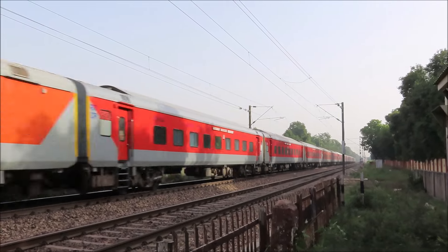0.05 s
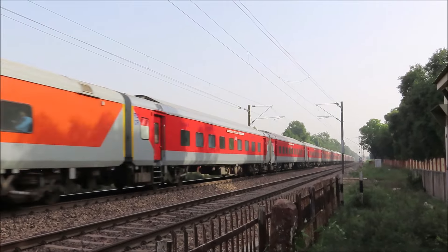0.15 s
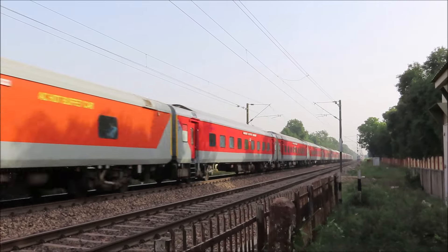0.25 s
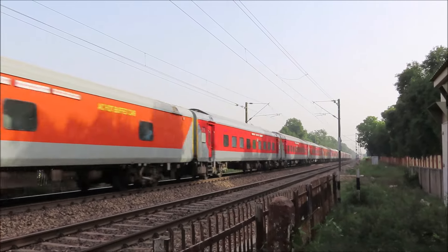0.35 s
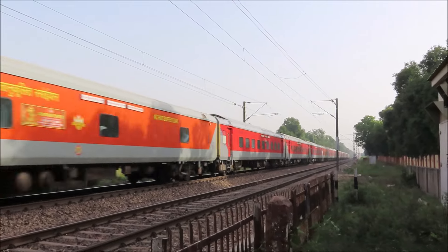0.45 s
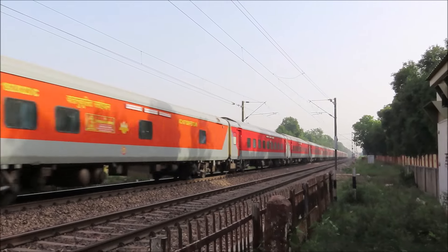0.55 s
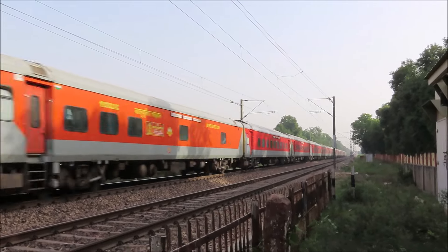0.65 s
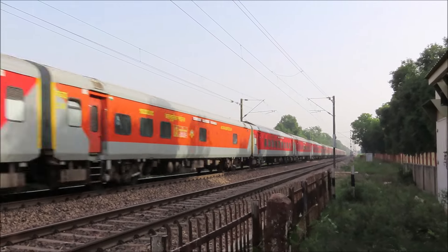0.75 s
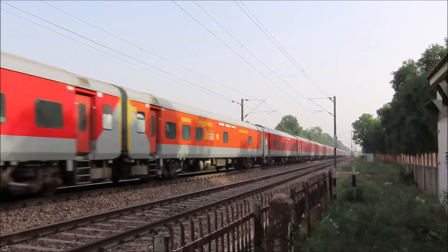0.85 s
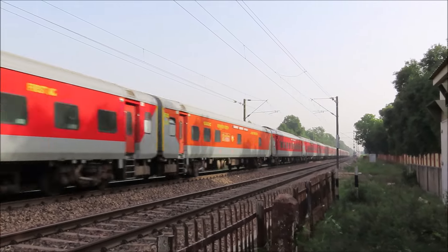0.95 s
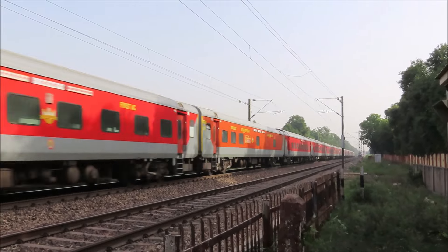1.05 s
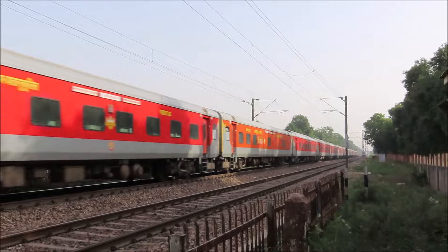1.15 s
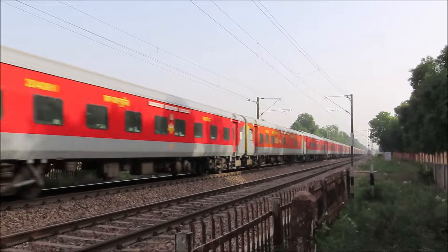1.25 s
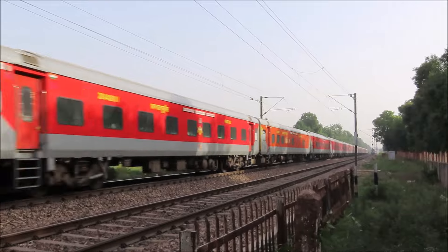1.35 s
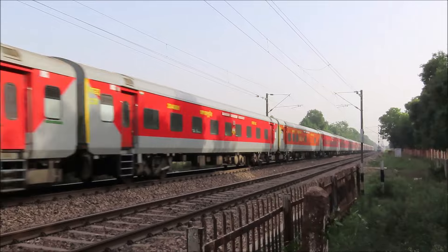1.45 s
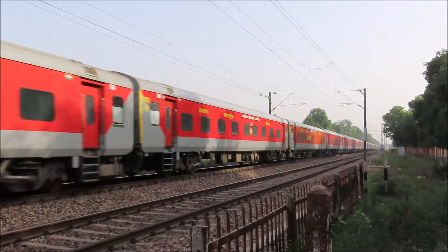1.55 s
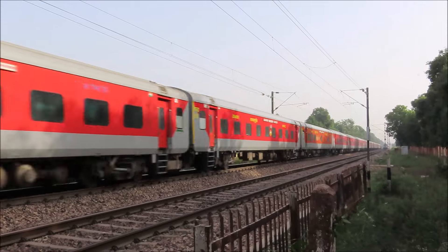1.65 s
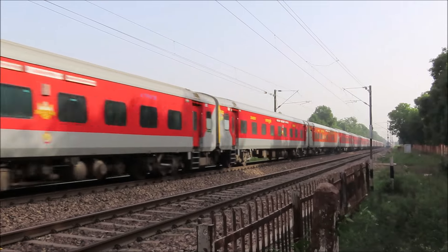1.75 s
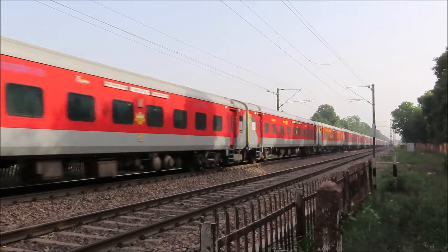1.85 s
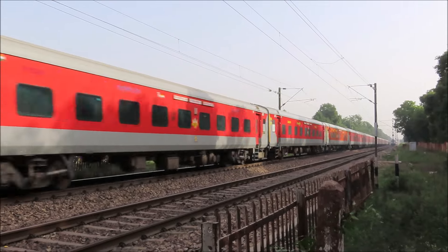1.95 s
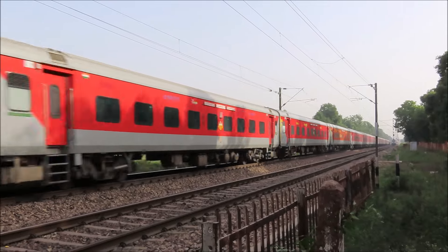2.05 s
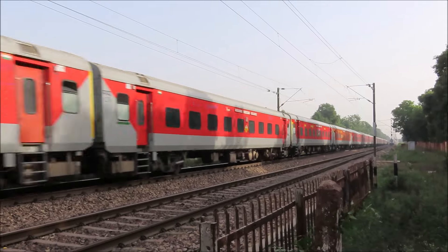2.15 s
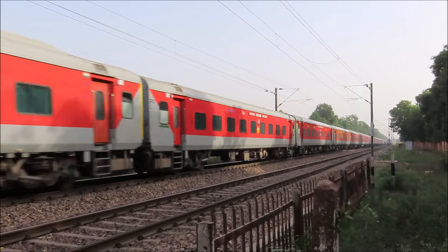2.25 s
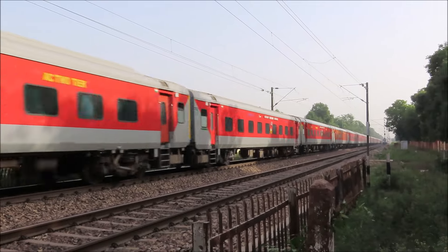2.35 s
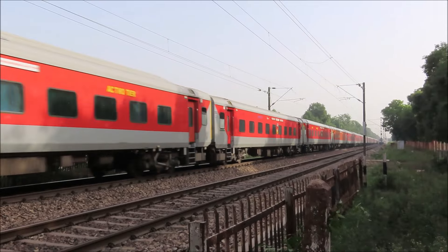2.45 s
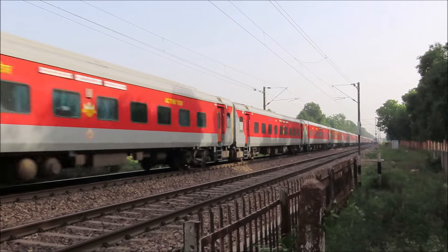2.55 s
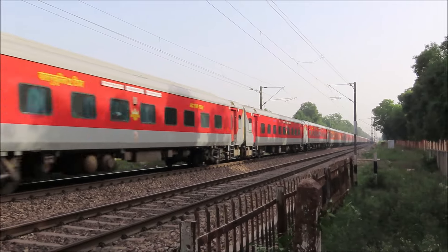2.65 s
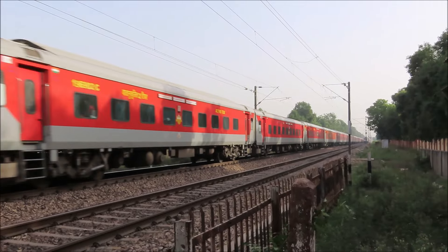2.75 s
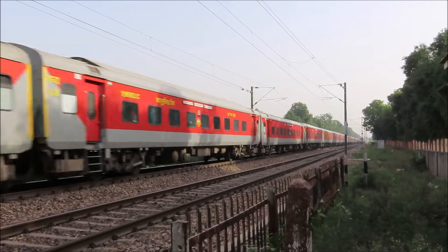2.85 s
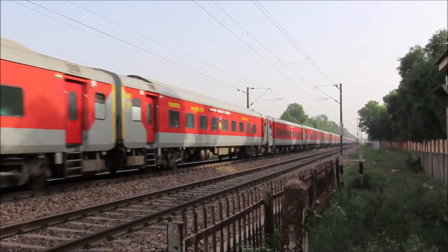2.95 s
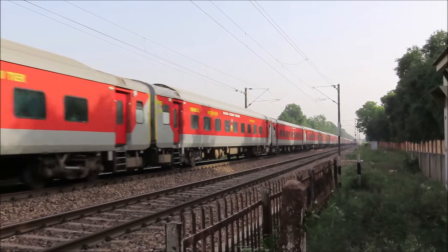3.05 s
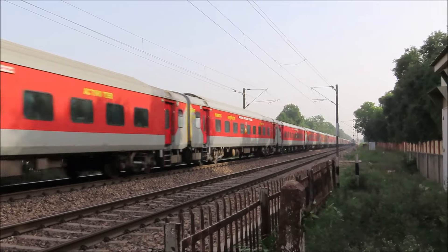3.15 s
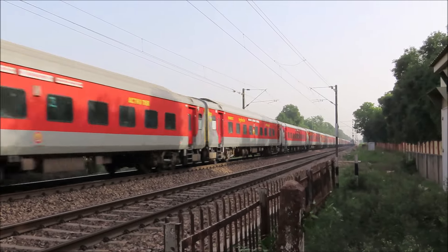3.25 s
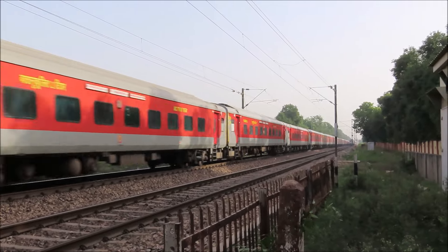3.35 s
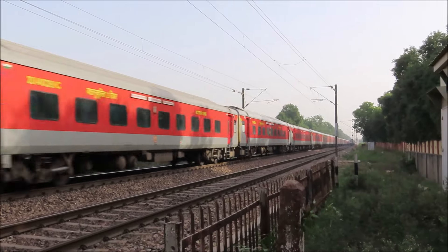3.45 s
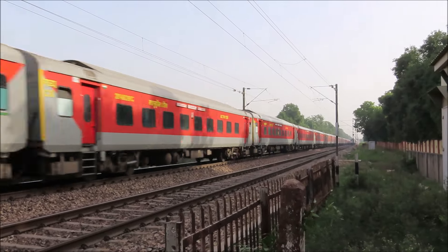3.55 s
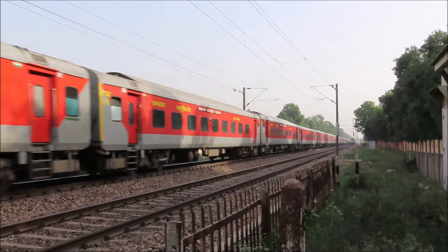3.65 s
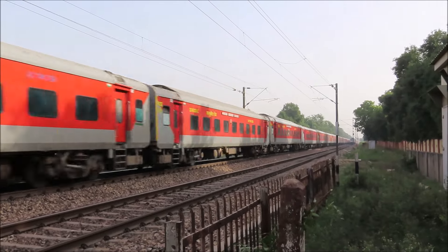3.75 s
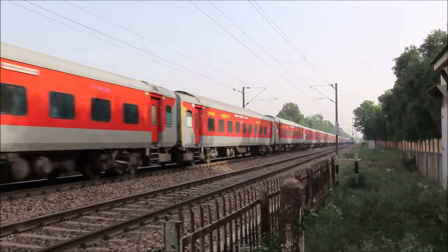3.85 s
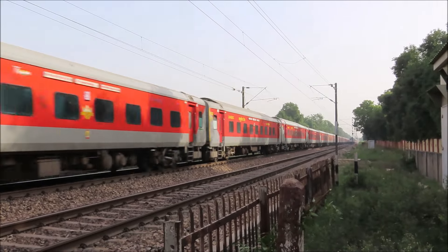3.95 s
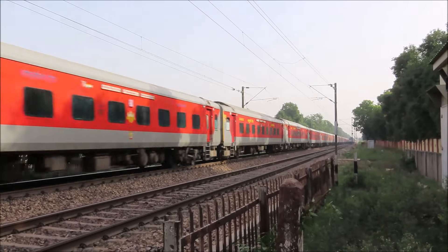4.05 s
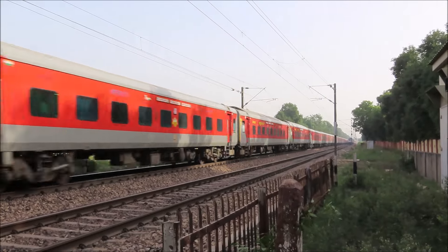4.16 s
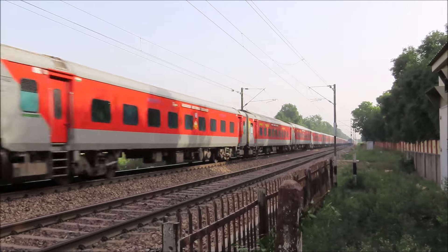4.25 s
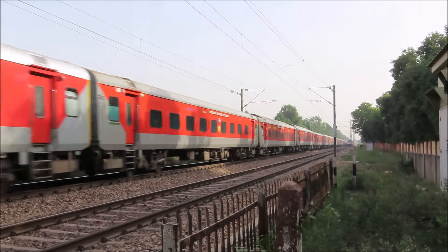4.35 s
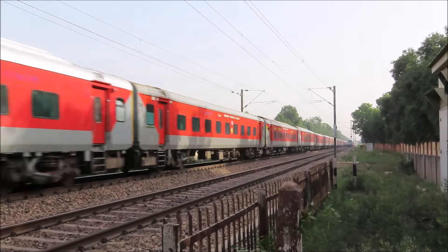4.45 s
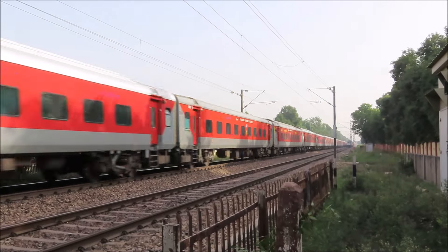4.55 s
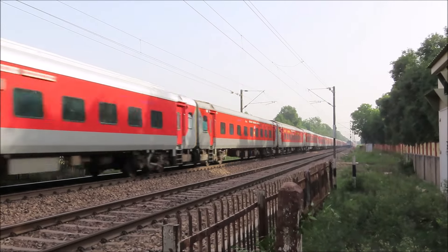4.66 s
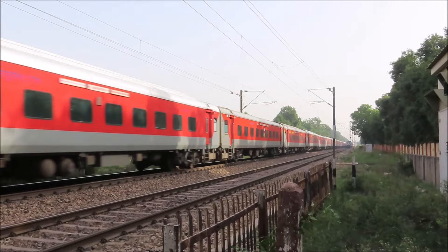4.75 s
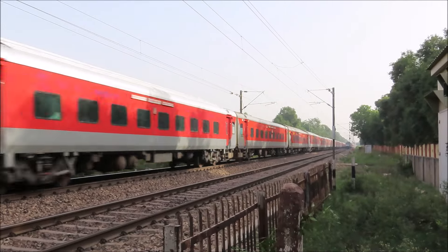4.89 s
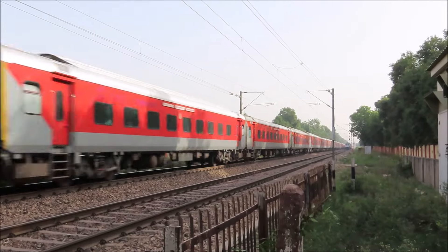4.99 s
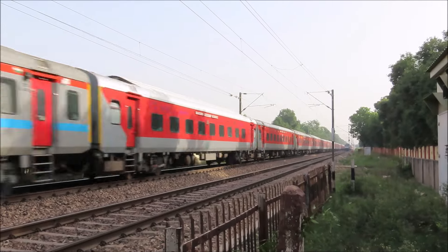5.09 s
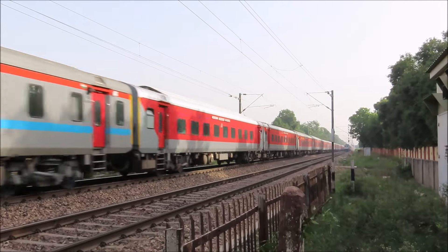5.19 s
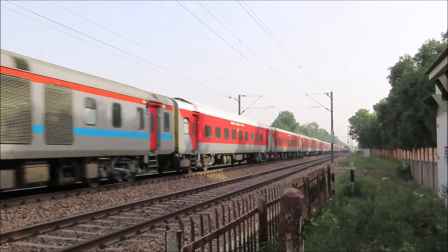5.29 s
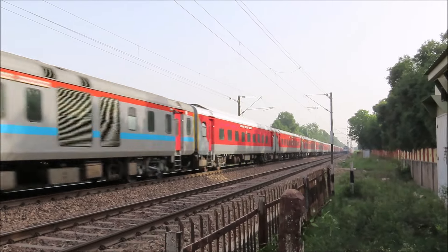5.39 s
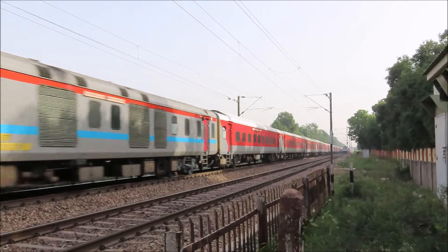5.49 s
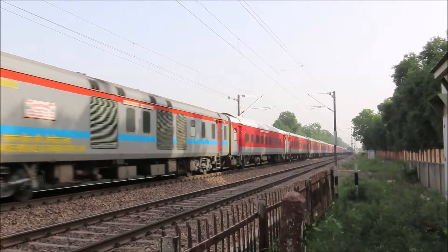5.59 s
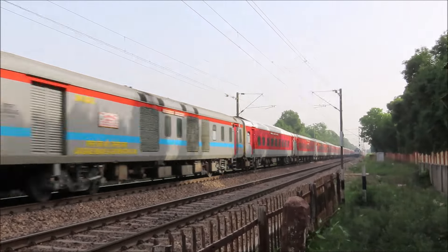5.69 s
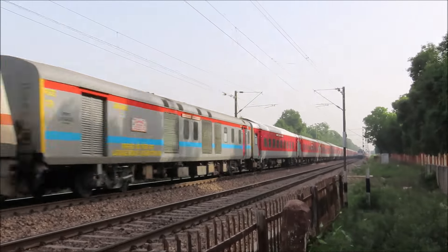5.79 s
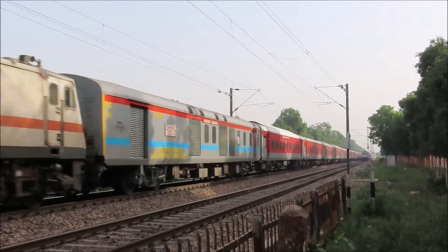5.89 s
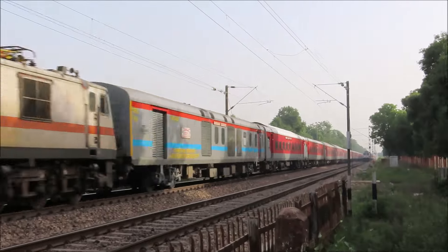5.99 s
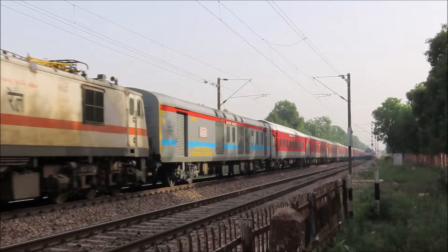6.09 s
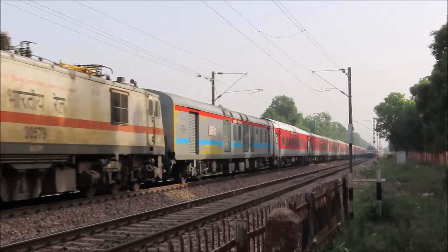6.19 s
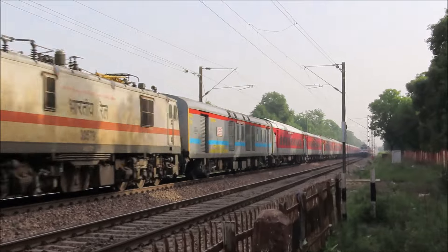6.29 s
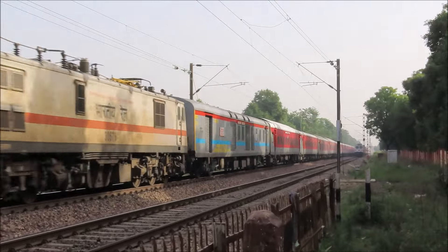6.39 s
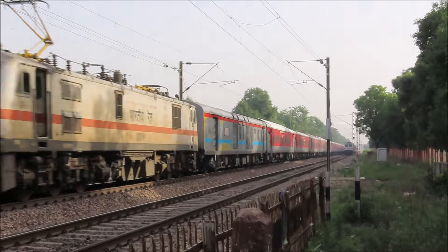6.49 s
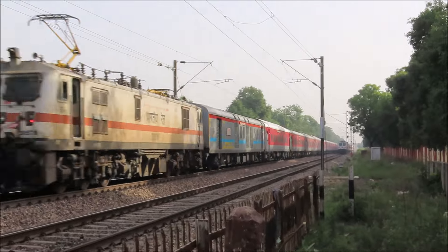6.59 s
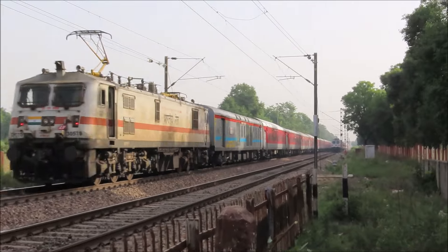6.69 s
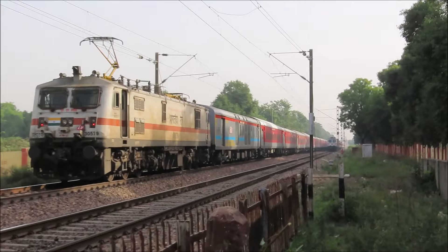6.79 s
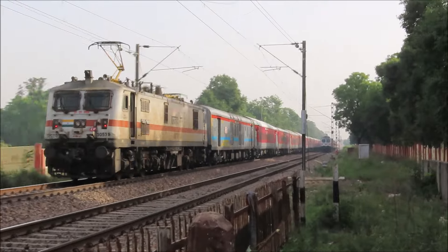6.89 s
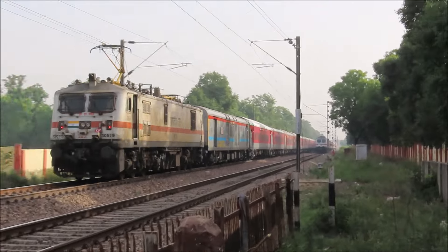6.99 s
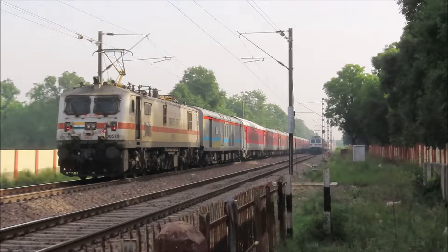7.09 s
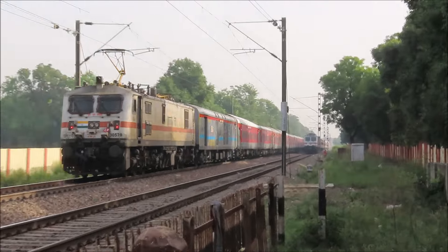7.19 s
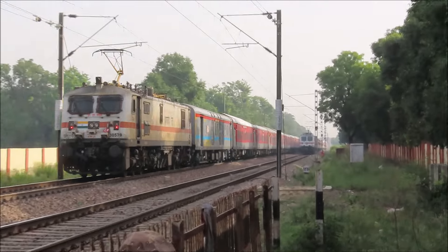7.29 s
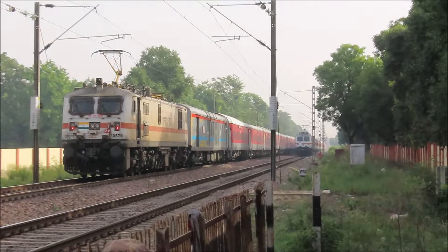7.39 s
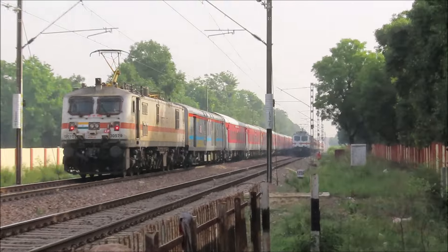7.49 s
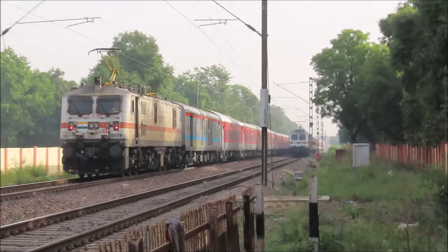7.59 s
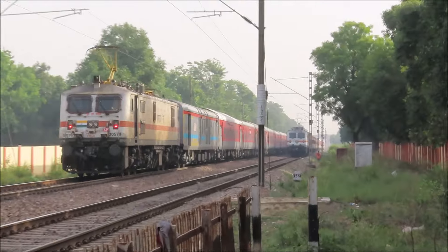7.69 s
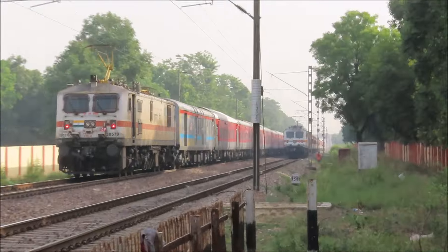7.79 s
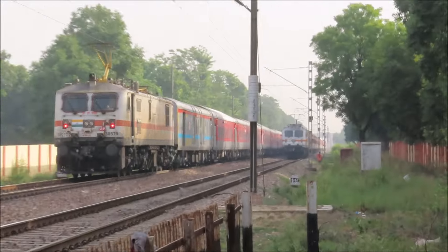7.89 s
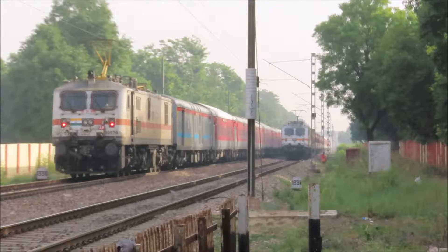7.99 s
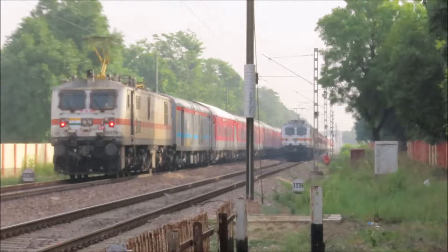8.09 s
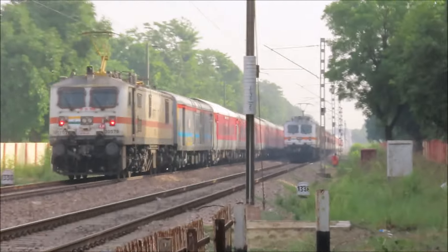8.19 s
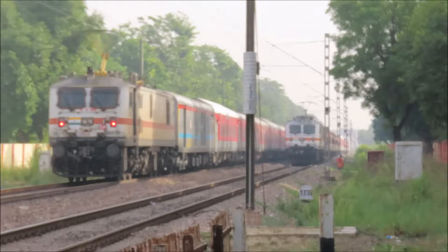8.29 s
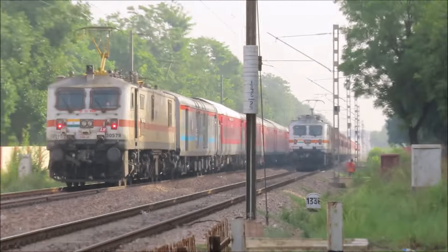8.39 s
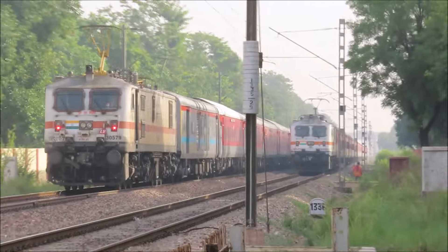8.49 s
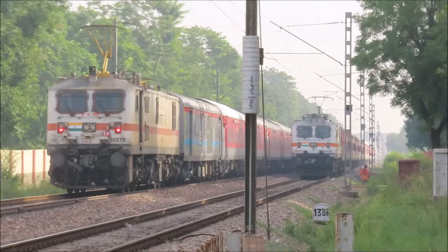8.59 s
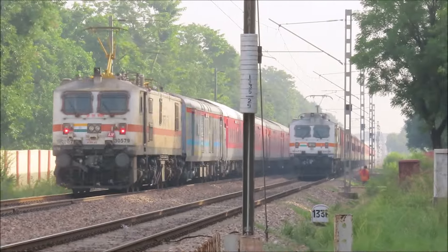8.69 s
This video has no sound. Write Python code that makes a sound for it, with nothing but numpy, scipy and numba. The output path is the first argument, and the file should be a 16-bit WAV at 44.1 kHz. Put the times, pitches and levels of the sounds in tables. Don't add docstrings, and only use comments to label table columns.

```python
import sys
import numpy as np
from scipy import signal
from scipy.fft import rfft, irfft, next_fast_len
from scipy.io import wavfile
from scipy.ndimage import uniform_filter1d
from numba import njit

SR = 44100
rng = np.random.default_rng(int(sys.argv[2]) if len(sys.argv) > 2 else 0)


def store_pcm(level_fs):
    pcm = np.round(np.clip(level_fs, -1, 1) * 32767).astype(np.int16)
    wavfile.write(sys.argv[1], SR, np.atleast_2d(pcm).T)


def amplitude_ratio(level_db):
    exponent = np.asarray(level_db, float) / 20
    return 10 ** exponent


N = 385434
SIZE = next_fast_len(N)
FREQ = np.maximum(np.fft.rfftfreq(SIZE, 1 / SR), 1)
TIME = np.arange(N) / SR


def curves(table):
    s, *columns = np.transpose(table)
    return [np.interp(TIME, s, c) for c in columns]


def shape(points):
    hz, db = np.transpose(points)
    return amplitude_ratio(np.interp(np.log(FREQ), np.log(hz), db))


def colour(x, gain):
    return irfft(rfft(x, SIZE) * gain, SIZE)[..., :N]


def noise():
    return rng.standard_normal((2, N))


def unit(x):
    return x / np.sqrt(np.mean(x ** 2))


@njit
def svf(x, hz, width):
    y = np.empty(x.shape)
    for row in range(x.shape[0]):
        b, l = 0., 0.
        for i in range(x.shape[1]):
            g, k = np.tan(np.pi * hz[i] / SR), width / hz[i]
            v = (b + g * (x[row, i] - l)) / (1 + g * (g + k))
            b, l, y[row, i] = 2 * v - b, l + 2 * g * v, k * v
    return y


def walk(rate):
    k = int(SR / rate)
    steps = np.repeat(rng.standard_normal(N // k + 1), k)
    return 1.3 * uniform_filter1d(uniform_filter1d(steps, k), k)[:N]


def band(hz, width):
    return unit(svf(noise(), hz + 0 * TIME, 1. * width)[0])


def ringing(modes, swing_db, doppler):
    out = np.zeros((2, N))
    for hz, width, db in modes:
        pitch = hz * (1 + doppler * walk(5))
        out += amplitude_ratio(db + swing_db * walk(7)) * svf(noise(), pitch, 1. * width)
    return out


def chatter(spectrum, count, chatter_db):
    out, gain = np.zeros((2, N + SR)), shape(spectrum)
    for when, pitch, length, size, row in rng.random((count, 5)):
        hz = 600 * (4600 / 600) ** pitch
        t = TIME[:int(SR * (.025 + .06 * length))]
        flare = np.sin(np.pi * t / t[-1]) ** 2 * np.sin(2 * np.pi * hz * t)
        level = amplitude_ratio(chatter_db + 6.9 * size) * np.interp(hz, FREQ, gain)
        out[int(2 * row), int(when * N):][:len(t)] += level * flare
    return out[:, :N]


ZONES_HZ = (115, 400, 1280, 2600, 5000)


def zones(spectrum, tones):
    whole = rfft(colour(noise(), shape(spectrum)) + tones, SIZE)
    below = [0] + [1 / (1 + (FREQ / hz) ** 10) for hz in ZONES_HZ] + [1]
    return [unit(irfft(whole * (high - low), SIZE)[:, :N]) for low, high in zip(below, below[1:])]


def train(spectrum, modes, rail_db, levels_db, rail_hz, swing_db, doppler, chatter_db):
    rail = amplitude_ratio(rail_db - 9.5) * svf(noise(), 1.048 * rail_hz, 178.)
    wheels = amplitude_ratio(-12.5) * ringing(modes, swing_db, doppler)
    wheels = wheels + chatter(spectrum, count=2400, chatter_db=chatter_db)
    return sum(amplitude_ratio(db) * part for db, part in zip(levels_db, zones(spectrum, rail + wheels)))


# frequency in Hz, density in dB per Hz.
NEAR = [(20, -49), (44, -18), (91, -12.5), (173, -1), (240, -4.5), (330, -10.5), (520, -11.5), (900, -10),
        (1330, -18), (2140, -19.5), (4000, -23), (8240, -32.5), (11000, -61), (15000, -86)]
# frequency in Hz, width in Hz, level in dB.
WHEEL = [(163.2, 33, 6), (1505, 99, -3.5), (1750, 220, -3.5), (2100, 62, -4), (2350, 38, -7),
         (2640, 32, -5), (3136, 140, -8)]


def express(levels_db, rail_hz):
    return train(NEAR, WHEEL, 0.5, levels_db, rail_hz, swing_db=1.4, doppler=0.017, chatter_db=-22.5)


def knocks(table):
    out, t, jangle_hz = np.zeros(N), TIME[:SR // 4], 45 * walk(120)
    for s, hz, db, t60 in table:
        pitch = hz + np.sqrt(hz / 2000) * jangle_hz[rng.integers(N - SR):][:len(t)]
        envelope = amplitude_ratio(db - 60 * t / t60) * (1 - np.exp(-t / 0.0012)) ** 2
        out[int(s * SR):][:len(t)] += envelope * np.sin(2 * np.pi * np.cumsum(pitch) / SR)
    return out


# start in seconds, peak in dB, frequency in Hz.
CLATTER = [(0.017, -8, 1460), (0.08, -10, 910), (0.252, -7, 790), (0.277, -9, 1070), (0.317, -7, 802),
           (0.368, -9, 784), (0.396, -13, 2160), (0.615, -4.5, 970), (0.652, -10, 1050), (0.852, -8, 926),
           (1.023, -7, 650), (1.121, -20, 870), (1.151, -10, 880), (1.194, -8, 856), (1.245, -4, 820),
           (1.507, -6.5, 950), (1.549, -11, 867), (1.639, -11, 861), (1.751, -13, 920), (1.801, -6, 925),
           (1.914, -6, 953), (1.954, -3.5, 947), (2.034, -13, 970), (2.08, -10, 985), (2.145, -12, 915),
           (2.217, -10, 982), (2.425, -11, 765), (2.538, -11, 740), (2.741, -5.5, 990), (2.828, -6, 890),
           (2.873, -12, 937), (2.918, -13, 696), (2.986, -7, 810), (3.194, -10.5, 870), (3.301, -8, 1017),
           (3.373, -8, 593), (3.422, -9, 789), (3.51, -11, 832), (3.867, -11, 931), (4.056, -9, 835),
           (4.182, -5.5, 947), (4.268, -10, 1710), (4.414, -8, 884), (4.674, -9, 894), (4.746, -8.5, 1020),
           (4.771, -8, 972), (5.02, -7, 1080), (5.063, -4.5, 910), (5.206, -8, 790), (5.297, -6, 681),
           (5.465, -11, 1170), (5.574, -17, 930), (5.63, -8, 750), (5.878, -5.5, 676), (5.931, -8, 746),
           (6.055, -9, 1000)]
# start in seconds, peak in dB, frequency in Hz.
FAR_CLATTER = [(7.022, -16, 620), (7.192, -21, 649), (7.238, -18, 677), (7.266, -19, 668),
               (7.332, -17, 650), (7.406, -18, 627), (7.537, -17, 666), (7.594, -18, 650),
               (7.617, -16, 646), (7.637, -21, 608), (7.676, -13.5, 587), (7.709, -22, 665),
               (7.852, -24, 573), (7.976, -18, 958), (8.029, -19, 940), (8.097, -17, 586),
               (8.226, -20, 692), (8.304, -24, 590), (8.46, -17, 619), (8.505, -19, 1660)]
# frequency in Hz, density in dB per Hz.
CRACK = [(300, -27), (700, 2.5), (1000, 8), (2100, -2.5), (4000, -13.5), (6500, -30), (10000, -75)]


def clatter():
    hits = CLATTER + FAR_CLATTER
    force = np.zeros(N)
    for s, db, hz in hits:
        t = TIME[:min(SR // 10, N - int(s * SR))]
        force[int(s * SR):][:len(t)] += amplitude_ratio(db - 13) * np.exp(-t / 0.011) * (1 - np.exp(-t / 0.00079))
    cracks = force * unit(colour(rng.standard_normal(N), shape(CRACK)))
    return cracks + knocks([(s, hz, db - 6, 0.061) for s, db, hz in hits if s < 8.4])


# middle in seconds, frequency in Hz, level in dB.
SINGS = [(.043, 2170, -22.5), (.42, 2154, -22), (.41, 3610, -34), (.68, 1507, -22.5), (.68, 2066, -27),
         (.682, 1700, -40), (.686, 2640, -36), (.694, 3250, -28.5), (.628, 3060, -32), (.625, 3900, -36),
         (.72, 1730, -28), (.74, 3050, -34), (1.3, 3530, -36), (1.065, 3910, -40), (1.2, 3720, -38),
         (1.13, 2065, -28), (1.15, 3160, -37), (1.35, 2300, -30), (1.56, 1960, -28.5), (1.85, 3280, -34),
         (2.87, 2073, -26), (2.95, 2590, -31), (4.41, 2690, -32), (4.58, 2660, -32), (2.5, 2100, -33),
         (4.65, 1750, -31), (4.85, 2150, -34), (1.18, 897, -19.5), (1.472, 924, -30), (1.729, 1874, -28),
         (1.774, 2350, -27.5), (1.81, 2800, -31.5), (1.838, 1610, -27), (1.88, 2210, -34),
         (1.89, 2750, -35), (2.099, 945, -19.5), (1.76, 3430, -36.5), (1.1, 1505, -25), (2.18, 1514, -27),
         (2.74, 2120, -28), (2.758, 1756, -33), (3.04, 1440, -25.5), (3.3, 1474, -21), (3.36, 2074, -28),
         (3.47, 2160, -25.5), (3.54, 2640, -33), (3.96, 2620, -30), (4.266, 2730, -33), (5.99, 1760, -33)]
# middle in seconds, frequency in Hz, level in dB.
FAR_SINGS = [(7.06, 2180, -49), (7.205, 1670, -45), (8.177, 1706, -43), (8.34, 2190, -44),
             (8.54, 1680, -38)]
# middle in seconds, frequency in Hz, level in dB.
LOCO_TONES = [(5.651, 127.6, -20.5), (5.679, 267.7, -20.5), (5.852, 52, -29), (5.995, 237.2, -22)]
# pitch as a ratio, level in dB.
NEIGHBOURS = [
    (1, 0),
    (.93, -10.5),
    (1.08, -12.5),
]


def sings():
    out, steady = np.zeros(N), .45
    waver_hz = 24 * walk(70)
    flutter = steady + (1 - steady ** 2) ** .5 * walk(110)
    songs = [(*row, .11) for row in SINGS + FAR_SINGS]
    songs += [(*row, 0.49) for row in LOCO_TONES]
    for s, hz, db, length in songs:
        span = slice(max(int((s - length) * SR), 0), int((s + length) * SR))
        t = (TIME[span] - s) / length
        own = rng.integers(N - SR) + np.arange(len(t))
        for k, (ratio, less_db) in enumerate(NEIGHBOURS):
            pitch = ratio * hz * (1 - 0.0082 * t) + np.sqrt(hz / 2000) * waver_hz[own - k * SR]
            envelope = amplitude_ratio(db + less_db - 1.0) * flutter[own - k * SR] * np.exp(-(t / 0.59) ** 4)
            out[span] += envelope * np.sin(2 * np.pi * np.cumsum(pitch) / SR)
    return out


# middle in seconds, half length in seconds, roll, ring and thump in dB.
BOGIES = [(0.054, 0.13, 2, 4, 3.5), (0.38, 0.14, 2.5, 4.5, 2.5), (0.676, 0.067, 0.5, 6.5, 2),
          (.92, 0.055, 2, -0.5, 0.5), (1.18, 0.11, 1, 1.5, 1), (1.362, 0.062, 2, 2, -1.5),
          (1.775, 0.045, 3.5, 1, -1.5), (2, 0.26, 5.5, -0.5, -3), (2.16, 0.11, -1.5, 6, 2),
          (2.497, 0.11, 7.5, 1, 2.5), (2.696, 0.04, 2.5, 0, 2), (2.88, 0.12, 3, 3, 1.5),
          (3.278, 0.1, 3, 3.5, 2), (3.63, 0.034, -0.5, 2, 6), (3.926, 0.15, 0, 2, 3.5),
          (4.31, 0.064, 2.5, 1, 0.5), (4.415, 0.017, -2, 4, 3), (4.635, 0.093, 2.5, 0, 4),
          (4.892, 0.22, 2.5, 5, -2.5), (5.047, 0.033, -1.5, 0.5, 10), (5.26, 0.037, 2.5, -0.5, 3),
          (5.37, 0.094, 3.5, 3.5, 5), (5.652, 0.18, 3, 1, 6.5), (5.85, 0.049, 1.5, 0.5, 3.5),
          (6.204, 0.053, -1.5, 0.5, -5)]
# middle in seconds, half length in seconds, roll, ring and thump in dB.
FAR_BOGIES = [(6.43, 0.078, -1, -0.5, 3), (6.97, 0.09, 1.5, 0.5, 0.5), (7.1, 0.15, 1, 2.5, -3.5),
              (7.32, 0.069, 6.5, -4.5, -2.5), (7.6, 0.057, 7, -4, 3.5), (7.69, 0.047, 5.5, -2, 4),
              (8.04, 0.11, 3.5, -3.5, 2), (8.4, 0.21, -2, 1, 2), (8.66, 0.083, -2.5, 0, 0)]


def bogies():
    out = np.zeros((3, N))
    for s, half, *db in BOGIES + FAR_BOGIES:
        out += np.outer(db, np.exp(-np.abs((TIME - s) / half) ** 2.9))
    return out


# level in dB, near and far.
NEAR_PARTS_DB = (-32, -21, -24.5, -28.5, -37.5, -50)
FAR_PARTS_DB = (-32.5, -31.5, -34.5, -37.5, -47.5, -60.5)
BRIGHT_SHARE = (0.0044, -0.42, 0.51, 0.8, 0.47, -0.1)
ROLL_SHARE = (0.14, 0.076, 0.74, 0.36, 0.4, 0)
RING_SHARE = (0, 0.14, 0.18, 0.71, 0.39, 0.072)
THUMP_SHARE = (0.35, 0.53, 0, 0.055, 0.052, 0)


def part_levels(near, loud_db, bright_db):
    roll_db, ring_db, thump_db = bogies()
    distance_db = np.outer(NEAR_PARTS_DB, near) + np.outer(FAR_PARTS_DB, 1 - near)
    bogie_db = np.outer(ROLL_SHARE, roll_db) + np.outer(RING_SHARE, ring_db) + np.outer(THUMP_SHARE, thump_db)
    return distance_db + loud_db + np.outer(BRIGHT_SHARE, bright_db) + bogie_db


# start in seconds, peak in dB,
# frequency in Hz.
THUDS = [(0.115, -9, 183), (0.375, -4.5, 228), (0.454, -5, 204), (0.532, -13, 182), (0.643, -11, 170),
         (0.849, -8.5, 162), (0.888, -12, 207), (0.935, -15, 181), (1.055, -7, 175), (1.136, -13, 155),
         (1.19, -10, 170), (1.232, -7, 208), (1.39, -11, 171), (1.459, -9, 166), (1.542, -13, 172),
         (1.584, -16, 157), (1.648, -8, 175), (1.713, -16, 210), (1.835, -7, 159), (1.942, -9, 213),
         (2.115, -3, 205), (2.207, -13, 181), (2.273, -9, 178), (2.465, -12, 191), (2.619, -15, 152),
         (2.683, -11, 182), (2.758, -15, 221), (2.81, -9, 178), (2.976, -6, 169), (3.051, -12, 169),
         (3.22, -7, 163), (3.33, -9, 157), (3.441, -14, 186), (3.495, -11, 167), (3.632, -8, 177),
         (3.691, -7, 175), (3.859, -11, 226), (4.159, -13, 175), (4.341, -6.5, 223), (4.403, -8, 176),
         (4.51, -5, 174), (4.575, -17, 221), (4.776, -12, 174), (4.871, -8, 177), (4.921, -17, 188),
         (5.033, -9, 169), (5.117, -9, 172), (5.316, -8, 185), (5.403, -12, 199), (5.516, -14, 161),
         (5.579, -7, 157), (5.683, -12, 213), (5.759, -7, 159), (5.874, -10, 237), (5.964, -15, 144),
         (6.004, -18, 147),
         (0.613, -9, 190),
    (0.666, -6, 182),
]


def thuds():
    out, t = np.zeros(N), TIME[:SR // 5]
    for (s, db, hz), start in zip(THUDS, rng.random(99)):
        boom = np.sin(2 * np.pi * (start + hz * t * (1 - 0.61 * t)))
        envelope = amplitude_ratio(db - 1 - 60 * t / 0.12) * (1 - np.exp(-t / 0.0048)) ** 2
        out[int(s * SR):][:len(t)] += envelope * boom
    return out


# frequency in Hz, peak in dB.
FLAT_MODES = [(1500, -24), (1720, -17), (2100, -14), (2560, -26), (3000, -26), (3650, -29), (4200, -29),
              (4550, -32), (5652, -35)]


def flats():
    strikes = ((2.138, 0), (2.905, -15))  # (s, dB)
    return knocks([(s, hz, db + less_db, 0.18) for s, less_db in strikes for hz, db in FLAT_MODES])


# time in seconds, level in dB.
HUM = [(5.5, -58), (5.9, -32), (6.2, -35), (6.8, -41.5), (7.15, -36), (7.45, -45), (7.65, -33), (7.85, -46),
       (8.74, -52)]


def hum():
    gear = svf(noise(), 648 * (1 + 0.023 * walk(3.1)), 38.)
    return amplitude_ratio(curves(HUM)[0]) * unit(svf(gear, 648 + 0 * TIME, 110.)[0])


# time in seconds, level in dB, sharpness in dB.
BLAST = [(5.605, -90, -2), (5.618, -54.5, -4), (5.71, -52, -10), (5.765, -54, -10), (5.785, -50, 4),
         (5.805, -50, -14), (5.83, -48, -14), (5.9, -47, -2), (5.99, -49.5, 1), (6.01, -56, 4),
         (6.08, -63, 4), (6.2, -88, 0)]


def jet_levels():
    jet_db, sharp_db = curves(BLAST)
    return amplitude_ratio(jet_db), amplitude_ratio(sharp_db)


def blast(gain):
    bright = shape([(7500, -23), (9500, 7), (12000, -7), (13800, -3), (15500, -15)])
    return gain * unit(colour(rng.standard_normal(N), bright))


# time in seconds, frequency in Hz, level in dB.
WHISTLE = [
    (5.84, 14150, -80),
    (5.89, 13900, -47),
    (5.93, 13750, -47),
    (5.97, 13600, -52),
    (6.03, 13400, -80),
]


def whistle():
    hz, db = curves(WHISTLE)
    return amplitude_ratio(db) * band(hz, 90)


# frequency in Hz, density in dB per Hz.
FAR = [(20, -13), (50, -8), (95, 3.5), (133, -3.5), (220, -3.5), (330, -15), (460, -11), (700, -12.5),
       (1300, -16), (2190, -24.5), (3260, -30.5), (6500, -40.5), (9500, -52), (12500, -60), (15000, -66)]
# frequency in Hz, width in Hz, level in dB.
FAR_WHEEL = [(1342, 35, -4.5), (1647, 61, -4.5), (2167, 96, -11)]


def far_trains(levels_db, rail_hz):
    return train(FAR, FAR_WHEEL, -11, levels_db, rail_hz, swing_db=0.57, doppler=0.016, chatter_db=-27.5)


SETTLES_S = 7.5
# frequency in Hz, width in Hz, level in dB, rise in dB per second.
WHINE = [
    (1655, 39, -46.5, -1),
    (2180, 30, -48, 6),
    (99, 18, -38.5, 0.5),
]


def motors():
    out = np.zeros(N)
    for hz, width, db, rise_db in WHINE:
        out += amplitude_ratio(db + rise_db * (TIME - SETTLES_S) + 2.0 * walk(2.7)) * band(hz, width)
    return out


# start in seconds, level in dB, decay in seconds.
GUSTS = [
    (6.47, -46, 0.06),
    (6.54, -52, .1),
    (6.95, -56, 0.74),
    (7.6, -49.5, 0.094),
    (8.1, -77, .15),
    (8.57, -57, .1),
]


def gusts():
    out = np.zeros(N)
    for s, db, decay in GUSTS:
        late = np.maximum(TIME - s, 0)
        out += amplitude_ratio(db) * (1 - np.exp(-late / 0.02)) * np.exp(-late / decay)
    return out


# start in seconds, level in dB, length in seconds.
TICKS = [(6.486, -42, .008), (6.499, -44, .02), (6.856, -45, .008), (6.927, -47, .008), (7.108, -48, .008),
         (7.154, -51, .006), (7.208, -52, .02), (7.38, -54, .01), (7.467, -53, .015), (7.522, -49, .008),
         (7.578, -58, .008), (7.735, -54, .008), (7.89, -58, .008), (7.96, -58, .008), (8.68, -56, .012)]


def ticks():
    envelope = sum(amplitude_ratio(db) * (TIME > s) * np.exp(-np.abs(TIME - s) / length) for s, db, length in TICKS)
    dry_grass = shape([(5500, -30), (7200, 8), (10000, -6), (12500, -3), (15000, -11)])
    return envelope * unit(colour(rng.standard_normal(N), dry_grass))


# start in seconds, frequency in Hz, peak in dB, T60 in seconds.
JOINTS = [(7.5, 643, -24, .15), (7.54, 816, -23, 0.09), (7.54, 1030, -25, 0.088), (7.592, 637, -20.5, 0.18),
          (7.588, 1070, -25, 0.081), (7.68, 1330, -33, .1), (7.705, 651, -22, 0.17),
          (8.0, 1020, -23, 0.052), (8.025, 910, -22, .12), (8.02, 1290, -20, 0.08), (8.055, 1150, -21, .07)]


def joints():
    return knocks(JOINTS)


# frequency in Hz, level in dB.
LEFT = [(80, -47), (260, -26), (600, -20.5), (900, -14.5), (1500, -13.5), (2150, -10.5), (2800, -11.5),
        (5000, -7.5), (8000, 0.5), (15000, 1)]
# frequency in Hz, level in dB.
SPREAD = [(80, -41), (260, -31), (430, -25), (800, -24), (1500, -18.5), (2150, -9.5), (3300, -11.5),
          (5200, -4), (7800, 0), (8350, -1), (8900, 7), (11000, 12.5), (14500, 11)]
# frequency in Hz, level in dB.
FAR_SPREAD = [(80, -52), (260, -30), (430, -23), (800, -26), (1250, -13.5), (1550, -23), (2500, -19),
              (5000, -11), (8200, -1), (10000, 0), (12000, 10), (14500, 11)]


def sideways(close, far):
    lead = np.exp(1j * 1.45 * FREQ ** 2 / (FREQ ** 2 + 2000 ** 2))
    direct = colour(close[0], shape(LEFT) * lead)
    return direct + colour(close[1], shape(SPREAD)) + colour(far[1], shape(FAR_SPREAD))


# time in seconds, share from 0 to 1.
NEARNESS = [(0, 1), (5.95, 0.97), (6.2, 0.72), (6.28, 0.34), (6.55, 0.19), (6.9, 0.03), (8.74, 0.11)]
# time in seconds, loudness in dB, brightness in dB.
PASSAGE = [(0, 1.5, 1), (.7, 1.5, 0), (.9, 0, 1.5), (1.6, 1, -0.5), (2.3, 0, -2), (3.0, 1, 1),
           (3.7, -.5, 1.5), (4.5, 0, 1), (5.2, 0, -1.5), (5.9, -0.5, 0.5), (6.22, 1.5, 3), (6.29, 2.5, -1),
           (6.5, 2, -3.5), (6.9, -.5, -1), (7.4, 1, -2), (7.85, -1, 3), (8.3, .5, 2.5), (8.74, 1.5, 3)]


def scene():
    loud_db, bright_db = curves(PASSAGE)
    near = np.clip(curves(NEARNESS)[0], 0, 1)
    away = 1 - near
    parts_db = part_levels(near, loud_db, bright_db)

    (jet, sharp), wake, air = jet_levels(), gusts(), amplitude_ratio(parts_db[-1])
    jet_body = amplitude_ratio(6.5) * jet
    rush = np.sqrt(air ** 2 + jet_body ** 2 + wake ** 2)
    parts_db[-1] = 20 * np.log10(rush)

    settling_db = 1.5 - 6 * np.maximum(TIME - SETTLES_S, 0)
    far_side_db = settling_db + 0.8 * 20 * np.log10(air / np.hypot(air, wake))
    side_db = near * -1 + away * far_side_db + 5 * (jet_body / rush) ** 2

    rail_hz = near * 894 + away * (700 + 44 * bright_db) + 35 * walk(11)
    rattle_db = 0.29 * walk(18) + 0.73 * walk(50)
    still = 0 * TIME
    levels_db = parts_db + np.array([still, still, 0.15 * rattle_db, rattle_db, rattle_db, 1.2 * walk(30)])

    songs = sings()
    close = np.sqrt(near) * express(levels_db, rail_hz)
    close[0] += near * songs + clatter() + thuds() + flats() + joints()
    far = np.sqrt(away) * far_trains(levels_db, rail_hz)
    far[0] += 1.36 * away * songs + hum() + away * motors()

    side = sideways(close, far)
    treble = colour(side, 1 / (1 + (4500 / FREQ) ** 4))
    abeam_db = near * 0.41 * (parts_db[3] - uniform_filter1d(parts_db[3], SR))
    side = (side - treble) * amplitude_ratio(abeam_db) + amplitude_ratio(side_db) * treble
    side += whistle() + ticks()
    mid = close[0] + far[0] + 0.4 * ticks() + blast(sharp * jet + amplitude_ratio(-23) * wake)
    return np.array([mid + side, mid - side])


def low_pass(x):
    return signal.sosfilt(signal.butter(12, 15050, fs=SR, output="sos"), x)


def record(dry):
    rounded = 1.304 * np.tanh(dry / 1.294)
    top_cut = signal.ellip(8, .2, 70, 15600, fs=SR, output="sos")
    return low_pass(signal.sosfilt(top_cut, rounded))


dry = scene()
out = record(dry)
store_pcm(out)
```